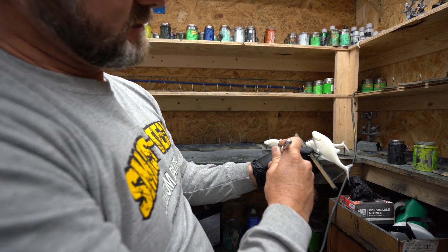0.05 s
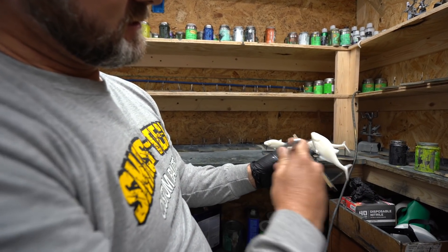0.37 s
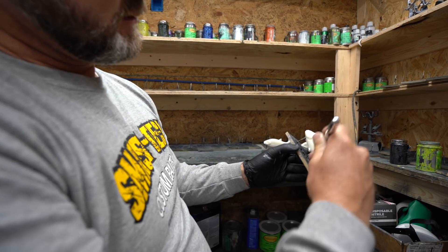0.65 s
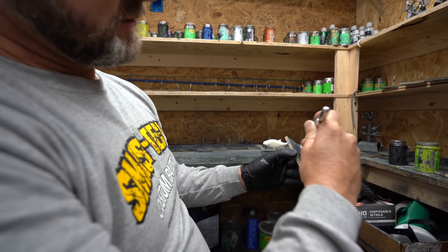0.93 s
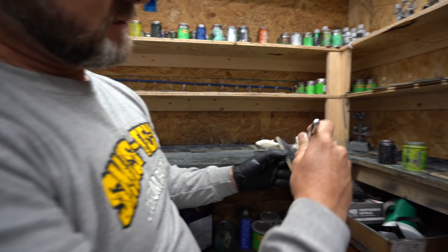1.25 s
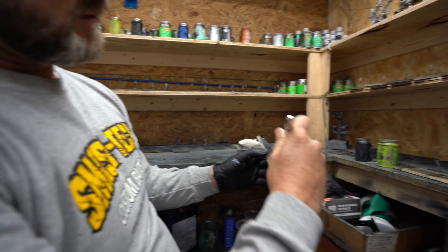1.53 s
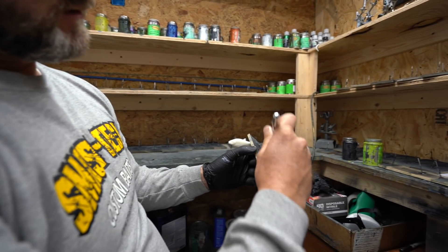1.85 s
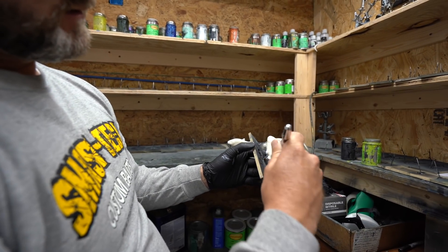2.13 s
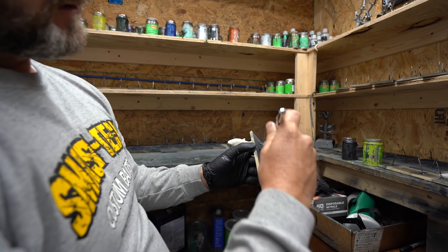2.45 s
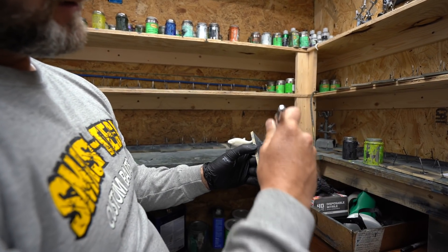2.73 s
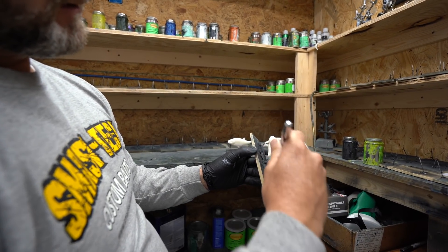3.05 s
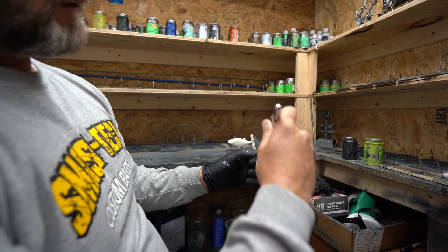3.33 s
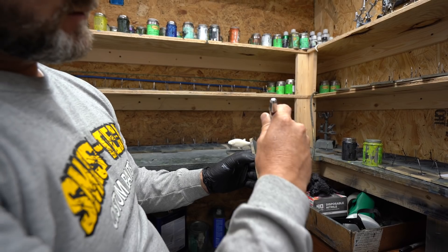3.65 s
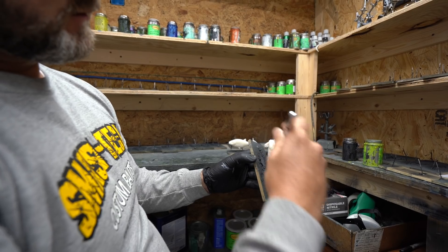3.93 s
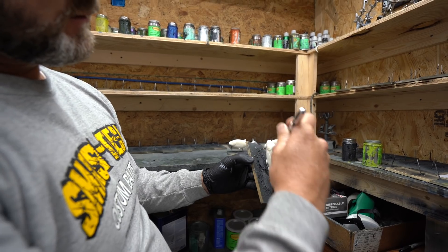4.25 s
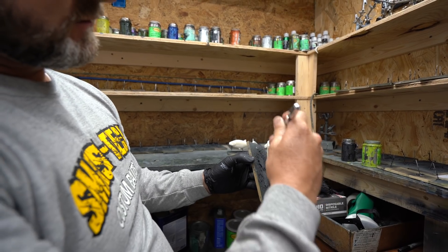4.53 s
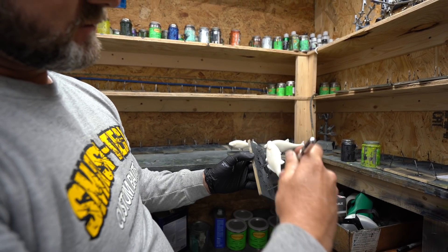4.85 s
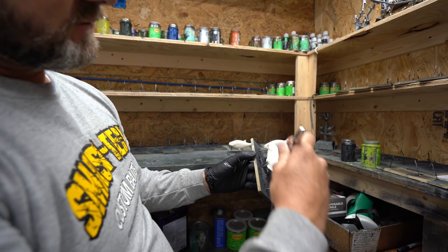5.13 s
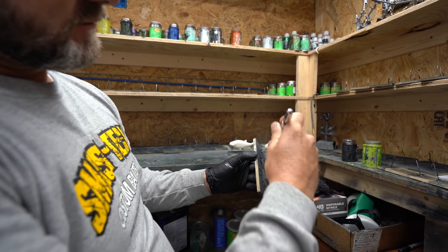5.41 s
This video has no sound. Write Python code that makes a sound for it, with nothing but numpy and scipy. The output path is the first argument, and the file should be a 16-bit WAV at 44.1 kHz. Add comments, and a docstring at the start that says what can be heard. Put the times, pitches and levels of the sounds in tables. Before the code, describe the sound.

An airbrush hisses throughout, close and slightly to the right, in a small, nearly dry wooden booth with a faint low rumble. In the first half second come a few quick spurts with tiny sharp spits, the loudest a thin, bright burst at about 0.3 seconds. A brief hollow scuff follows near 0.6 seconds. From 0.7 to 2 seconds the trigger gives several softer puffs of paint mist. From about 2.3 seconds the puffs are stronger and regular, each roughly a third of a second long, near 2.3, 2.7, 3.2, 3.7, 4.2, 4.6 and 5.1 seconds, easing off around 5.5. Between and under them the jet sweeps over a stencil with a lower, swelling rush and a faint hollow tone against the hand. Small spits occur near 1.7, 2 and 2.5 seconds, and short low gusts hit the glove between 4 and 4.8 seconds.

```python
"""An airbrush paints a small model held behind a stencil, in a wooden booth. Air hisses all the time; each pull
of the trigger adds a brighter puff of tiny paint droplets. The jet rushes over the stencil and the gloved hand,
and flutters where it catches an edge; the stencil ticks sharply against the model. Close shelves colour the
hiss and the walls echo the ticks, over a faint low rumble."""
import sys
import numpy as np
from scipy import signal
from scipy.fft import rfft, irfft, next_fast_len
from scipy.io import wavfile
from scipy.ndimage import uniform_filter1d, map_coordinates

SR = 44100
rng = np.random.default_rng(int(sys.argv[2]) if len(sys.argv) > 2 else 0)


def file_out(sig):
    """Save sig as 16-bit WAV at sys.argv[1]."""
    # one column per channel
    cols = np.atleast_2d(sig).T
    # limit, then scale
    lim = np.clip(cols, -1, 1)
    pcm = np.round(lim * 32767).astype(np.int16)
    wavfile.write(sys.argv[1], SR, pcm)


N = 250261

# The tone of air, fine mist and larger droplets. Each row: frequency in Hz, relative level in dB.
AIR_TONE = [(200, -30), (500, -7.5), (1000, -5), (2600, -4), (3700, -2), (5000, -1), (8500, 0.5),
            (12000, -1), (16000, 1.5)]
MIST_TONE = [(400, -57), (1200, -42), (2600, -15.5), (4000, -13.5), (5000, -6), (8500, -1.5), (12500, 0.5),
             (14500, 1.3), (16000, -2)]
DROPLET_TONE = [(500, -17.5), (1300, -11), (2700, 2.5), (4200, 3), (6500, -12), (16000, -22)]
def airbrush():
    """A steady air jet; paint drawn into it breaks into droplets and hisses louder and brighter."""
    paint_db = trigger() + 0.41 * wobble(21.93)  # the finger is never quite still
    air = amp(-35 + 1.3 * wobble(11)) * close_echoes(rush(AIR_TONE), strength=0.42, sway_s=3e-5)
    sputter_db = 0.3 * wobble(55) + 0.84 * wobble(400)  # the paint leaves the needle unevenly
    mist = close_echoes(rush(MIST_TONE), strength=0.61, sway_s=4e-5)
    droplets = close_echoes(rush(DROPLET_TONE), strength=0.5, sway_s=4e-5)
    # the lower hiss grows slowly and levels off: a hard pull is a thin, sharp "tss"
    droplet_db = 0.7 * np.minimum(paint_db, -26) - 22
    return air + amp(paint_db + 1.75 + sputter_db) * mist + amp(droplet_db + sputter_db) * droplets


# Each row: start in seconds, seconds until let go, relative flow in dB, seconds to open, seconds to close.
TRIGGER_PULLS = [(-0.03, 0.031, -27, .02, 0.038), (0.138, 0.018, -36, .013, .015),
                 (0.252, 0.05, -17.5, 0.049, 0.067), (0.352, 0.031, -26.5, 0.027, 0.065),
                 (0.71, .062, -28, .058, 0.066), (0.786, 0.19, -34, 0.037, .055),
                 (1.072, 0.26, -32, 0.055, 0.021), (1.445, 0.23, -35.5, 0.052, .117),
                 (1.798, .237, -32, 0.07, .034), (2.272, .203, -26.5, 0.028, 0.07),
                 (2.69, 0.22, -26, 0.064, 0.1), (3.185, 0.25, -25.5, 0.089, 0.14),
                 (3.714, 0.23, -28.5, 0.11, 0.11), (4.198, .208, -28, 0.046, 0.092),
                 (4.581, .266, -27, 0.12, 0.1), (5.099, 0.35, -26.5, 0.12, .081),
                 (5.479, .22, -36.5, .034, .05)]
# Mist that escapes between pulls. Each row: time in seconds, relative flow in dB.
PAINT_LEAK = [(0.0, -37.5), (0.55, -41), (1.1, -37), (5.67, -37)]
def trigger():
    """Paint flow in dB: each pull opens the needle evenly, holds it and lets it close."""
    t = clock()
    power = amp(over_time(PAINT_LEAK)) ** 2
    for start, held, db, draw, release in TRIGGER_PULLS:
        opening = np.clip((t - start) / draw, 0, 1)
        closing = np.clip(1 - (t - start - held) / release, 0, 1)
        power += (amp(db) * opening * closing) ** 2
    return 10 * np.log10(power)


# Passes of the jet. Each row: time when closest in seconds, half-length in seconds, relative level in dB.
JET_SWEEPS = [(0.795, .055, -37.5), (0.95, 0.035, -42.5), (1.146, 0.059, -36), (1.418, 0.14, -36),
              (2.054, 0.12, -35), (2.279, 0.082, -32), (2.713, 0.021, -41), (2.975, 0.15, -38.5),
              (3.198, 0.042, -35), (3.42, 0.11, -40), (3.778, 0.033, -35.5), (3.97, 0.15, -38.5),
              (4.204, 0.05, -34.5), (4.38, 0.08, -37), (4.638, 0.023, -34), (4.84, 0.13, -35.5),
              (5.14, 0.066, -34.5), (5.405, 0.14, -51), (5.68, 0.037, -41)]
# The jet's fringe between passes. Each row: time in seconds, relative level in dB.
JET_FRINGE = [(0.0, -56), (0.66, -66), (0.8, -44), (2.6, -44), (3.6, -48.5), (4.5, -54), (5.67, -44)]
# Air on the stencil. Each row: frequency in Hz, relative level in dB.
STENCIL_TONE = [(200, -35), (450, -8.5), (800, -2.5), (1400, -0.5), (1900, -3), (2800, -2.5), (4000, -8.5),
                (7000, -11), (16000, -36)]
def stencil():
    """The jet rushes over the stencil, swelling and fading with each pass."""
    t = clock()
    power = sum(amp(db) ** 2 * np.exp(-((t - closest) / half) ** 2) for closest, half, db in JET_SWEEPS)
    power += amp(over_time(JET_FRINGE)) ** 2
    level_db = 10 * np.log10(power) - 0.33 + 0.47 * wobble(35)
    return amp(level_db) * close_echoes(rush(STENCIL_TONE), strength=0.28, sway_s=0.00022)


# How strongly the hand sounds. Each row: time in seconds, level in dB.
HAND_LEVEL = [(0.0, -72), (0.3, -66), (0.58, -45), (1.5, -44), (2.25, -49), (2.7, -43.5), (3.05, -46.5),
              (3.65, -48.5), (3.82, -43.5), (4.08, -46.5), (4.3, -41), (4.42, -42), (4.5, -49),
              (4.6, -41.5), (4.84, -40.5), (4.98, -58), (5.2, -45), (5.67, -44.5)]
# Its hollow tone. Each row: frequency in Hz, relative level in dB.
HAND_TONE = [(110, -22), (200, -12), (275, -6.5), (320, -4.5), (380, 2), (470, 1.5), (560, -8), (680, -7.5),
             (830, -5), (1100, -15.5), (3000, -37)]
def hollow_hand():
    """The jet sounds the hollow of the hand."""
    return amp(over_time(HAND_LEVEL) + 0.38 * wobble(35)) * rush(HAND_TONE)


# Each row: start in seconds, relative level in dB, pitch in Hz, seconds for the ring to fade by 60 dB.
STENCIL_TICKS = [(0.1049, -22, 1870, 0.017), (0.1089, -23, 1860, 0.027), (0.1462, -26, 2780, .016),
                 (0.15, -31, 1830, .035), (0.1985, -14, 2250, 0.0038), (0.202, -25.5, 2320, 0.022),
                 (1.69, -31.5, 2520, 0.014), (2.031, -30, 2230, 0.007), (2.497, -26.5, 2450, 0.011)]
def stencil_ticks():
    """The stencil ticks against the model: a sharp, rough ring that dies quickly."""
    out, t = np.zeros(N + SR), np.arange(SR // 8) / SR
    for start, db, hz, fade_s in STENCIL_TICKS:
        pitch_jitter = uniform_filter1d(rng.standard_normal(len(t)), size=16)
        ring = np.sin(2 * np.pi * hz * t + 0.11 * np.cumsum(pitch_jitter))
        ring += 0.045 * rng.standard_normal(len(t))
        envelope = amp(-60 * t / fade_s) * (1 - np.exp(-t / 0.00014))
        out[round(start * SR):][:len(t)] += amp(db + 3.5) * ring * envelope
    return out[:N]


def spatter():
    """A rough burst of noise goes with each tick."""
    return sum(eddies(start, 0, db - 13.5, hz, octaves=0.65, fade_s=0.061)
               for start, db, hz, _ in STENCIL_TICKS)


# Each row: start in seconds, hold in seconds, level in dB, centre in Hz, half-width in octaves.
AIR_FLUTTERS = [(0.033, 0.031, -50, 570, 0.29), (0.178, 0.018, -36.5, 4800, .1),
                (0.284, 0.0068, -38, 1900, 0.11), (0.405, 0.032, -36.5, 2000, 1),
                (2.007, 0.03, -37, 2080, 0.58), (2.129, 0.17, -42, 2000, .6),
                (3.891, 0.083, -43, 390, 0.11), (4.349, 0.064, -42, 399, 0.094)]
def air_flutters():
    """Short flutters of air: a few narrow whistles, a broad puff and a brighter rush over the stencil."""
    return sum(eddies(*row) for row in AIR_FLUTTERS)


# Each row: start in seconds, hold in seconds, level in dB, centre in Hz.
GLOVE_GUSTS = [(0.266, 0.013, -32, 820), (0.38, 0.013, -35, 850), (0.447, .015, -37.5, 600),
               (0.521, 0.014, -42, 400), (1.426, 0.028, -40, 560), (2.987, 0.017, -37.5, 950),
               (4.011, .02, -36, 700), (4.213, 0.026, -36, 620), (4.746, 0.023, -32.5, 680),
               (4.807, 0.071, -39.5, 520)]
def glove_gusts():
    """The jet hits the glove in broad, low gusts."""
    return sum(eddies(*row, octaves=1.24) for row in GLOVE_GUSTS)


# What the scuff rings with. Each row: centre in Hz, half-width in octaves, level in dB.
SCUFF_BANDS = [(860, 0.083, -38), (1250, .11, -35), (1700, 1.1, -34), (1940, 0.022, -37)]
def scuff():
    """One hollow scuff as the hand moves up."""
    return sum(eddies(start_s=0.5726, hold_s=0.04, db=db, centre_hz=hz, octaves=width, attack_s=0.005)
               for hz, width, db in SCUFF_BANDS)


# Big swirls sound low, small ones high. Each row: frequency in Hz, relative level in dB.
EDDY_TONE = [(120, -34), (230, 1.5), (5000, 2.5), (10000, -10)]
def eddies(start_s, hold_s, db, centre_hz, octaves, attack_s=0.00068, fade_s=0.12):
    """Swirls of air shed at an edge: a band of noise starts fast, holds, then drops 60 dB in fade_s."""
    def band_db(hz):
        distance = np.log2((hz + 1) / centre_hz) / octaves
        return over_pitch(EDDY_TONE, hz) - 10 * np.log10(1 + distance ** 4)
    out, t = np.zeros((2, N + SR)), np.arange(SR // 4) / SR
    envelope = (1 - np.exp(-t / attack_s)) * amp(-60 * np.maximum(t - hold_s, 0) / fade_s)
    out[:, round(start_s * SR):][:, :len(t)] = amp(db) * envelope * booth_noise(band_db, size=len(t))
    return out[:, :N]


def close_echoes(sound, strength, sway_s):
    """Four echoes per ear from the work and shelves colour the hiss; they shift as the hand moves."""
    t, out = clock(), sound.copy()
    for ear in range(2):
        for delay_s in rng.uniform(0.000993, 0.009, 4):
            echo_time = t - delay_s - sway_s * wobble(2)
            out[ear] += strength * map_coordinates(sound[ear], [echo_time * SR], order=1)
    return unit(out)


# Peaks and dips between the shelves. Each row: frequency in Hz, width in Hz, boost in dB.
SHELF_PEAKS = [(193.4, 12, 7), (279, 27, 6.5), (344, 8, -4), (463, 26, 3), (562, 18, 2), (594, 48, 5),
               (632, 32, -6), (666, 20, 4.5), (730, 53, -5.5), (756, 20, 4.5), (819, 13, 8.5),
               (900, 53, -2.5), (955, 47, 4), (1130, 270, -2), (1316, 32, 3), (1660, 22, 6), (1905, 34, 6),
               (2230, 78, -2), (2650, 130, -1), (3150, 100, -2), (3850, 420, -0.5), (4580, 60, 4),
               (8300, 70, 3.5), (8780, 70, 3.5)]
# Each row: frequency in Hz, how alike the two ears are (1 means the same).
EAR_LIKENESS = [(40, .999), (200, 0.97), (450, 0.99), (700, 0.88), (1150, 0.67), (1600, 0.76), (2200, 0.42),
                (4000, 0.15), (7000, 0.039), (14000, 0.072)]
def booth_noise(tone_db, size=N):
    """Noise coloured by the shelves: alike at both ears in the bass, unrelated in the treble."""
    def response(hz):
        shelf_db = sum(db / (1 + (2 * (hz - centre) / width) ** 2) for centre, width, db in SHELF_PEAKS)
        spread = np.arccos(np.clip(over_pitch(EAR_LIKENESS, hz), -1, 1)) / 2
        return amp(tone_db(hz) + shelf_db) * np.array([np.cos(spread), np.sin(spread)])
    mid, side = filtered(rng.standard_normal((2, size)), response)
    return unit(np.array([mid + side, mid - side]))


# Each row: frequency in Hz, seconds for the echo to fade by 60 dB.
WALL_FADE = [(200, 0.3), (2000, 0.15), (12000, 0.082)]
def walls(sound):
    """The short echo of the wooden booth, different at each ear."""
    hz, t, noise = signal.stft(rng.standard_normal((2, SR // 3)), SR, nperseg=256)
    fade = amp(-60 * t / over_pitch(WALL_FADE, hz)[:, None])
    tail = signal.istft(noise * fade, SR, nperseg=256)[1]
    delayed = np.pad(sound, (round(0.004 * SR), 0))
    return signal.fftconvolve(delayed[None], tail / np.linalg.norm(tail[0]), axes=1)[:, :N]


# Each row: frequency in Hz, relative level in dB.
RUMBLE_TONE = [(15, -12), (30, -15), (42, 1), (58, -5.5), (75, -9.5), (105, -10), (130, -7), (160, -12.5),
               (250, -16.5), (600, -15.5), (2000, -43)]
def room_rumble():
    """The room rumbles faintly, slowly rising and falling."""
    level_db = over_time([(0, -57.5), (1.2, -54.5), (1.7, -56), (3, -54.5), (5.1, -52.5), (5.67, -54)])
    return amp(level_db) * rush(RUMBLE_TONE)


def rush(tone):
    """Steady booth noise shaped by a tone table."""
    return booth_noise(lambda hz: over_pitch(tone, hz))


def amp(db):
    """Turn decibels into a multiplier."""
    return 10 ** (np.asarray(db) / 20)


def unit(x):
    """Scale to an average power of 1."""
    return x / np.sqrt(np.mean(x ** 2) + 1e-20)


def clock():
    """The time of every sample in seconds."""
    return np.arange(N) / SR


def over_pitch(rows, hz):
    """Read between (Hz, value) rows, with octaves evenly spaced."""
    row_hz, values = np.transpose(rows)
    return np.interp(np.log(hz + 1), np.log(row_hz + 1), values)


def over_time(rows):
    """Join (seconds, value) rows with straight lines."""
    return np.interp(clock(), *np.transpose(rows))


def wobble(rate):
    """A smooth curve through `rate` random points a second."""
    return map_coordinates(rng.standard_normal(4096), [clock() * rate], mode="wrap")


def filtered(x, response):
    """Multiply each frequency in x by response(hz)."""
    n = x.shape[-1]
    padded = next_fast_len(n + SR // 8)
    return irfft(rfft(x, padded) * response(np.fft.rfftfreq(padded, 1 / SR)), padded)[..., :n]


# Each row: frequency in Hz, left level minus right level in dB.
LEFT_LEVEL = [(300, 0), (430, -1.3), (580, 2), (720, -1.5), (830, -1), (1050, 1), (1330, -4), (1550, -0.5),
              (2200, -3.5), (2600, -1.7), (5800, -1), (8200, -2.5), (10000, -1), (14500, -0.5)]
# Each row: frequency in Hz, how far the left wave runs ahead in radians.
LEFT_LEAD = [(500, 0), (950, -0.8), (1250, 0.9), (2000, -.5), (2500, 0.6), (4200, -2.5), (7000, -3),
             (9000, -.5), (14000, 1.4)]
def boards(hz):
    """Nearby boards tip each frequency towards one ear, in level and in timing."""
    half = np.array([[0.5], [-0.5]])
    return amp(half * over_pitch(LEFT_LEVEL, hz)) * np.exp(1j * half * over_pitch(LEFT_LEAD, hz))


def scene():
    """The airbrush works a little to the right, over the low rumble of the room."""
    ticking, rumble = stencil_ticks(), room_rumble()
    jet = airbrush() + stencil() + hollow_hand()
    bursts = air_flutters() + glove_gusts() + scuff() + spatter()
    return filtered(jet + bursts + ticking + amp(-1) * walls(ticking) + rumble, boards)


def record(dry):
    """Cut away the very highest treble."""
    return filtered(dry, lambda hz: hz < 15780)


dry = scene()
out = record(dry)
file_out(out)
```